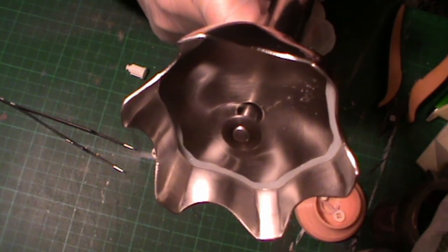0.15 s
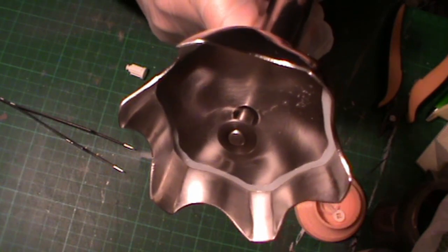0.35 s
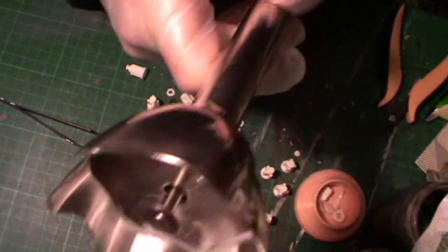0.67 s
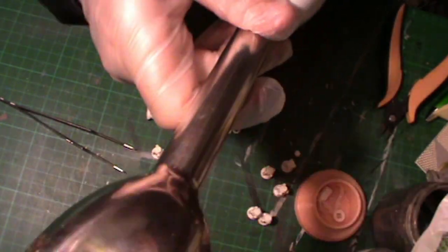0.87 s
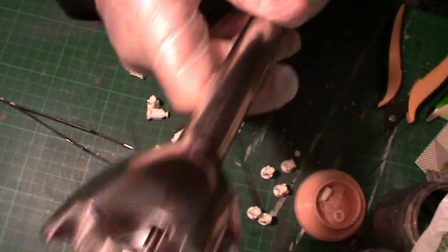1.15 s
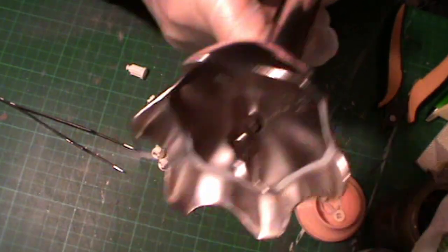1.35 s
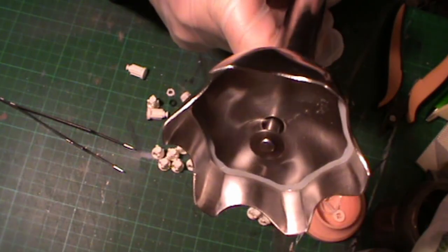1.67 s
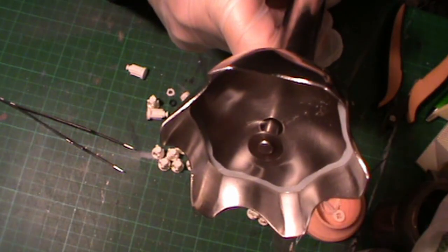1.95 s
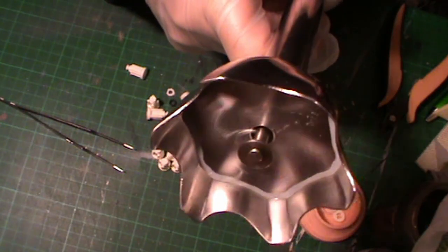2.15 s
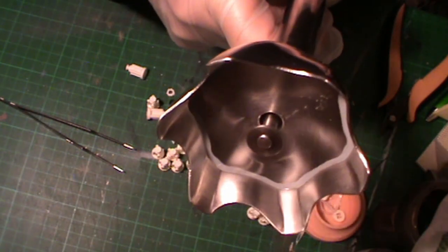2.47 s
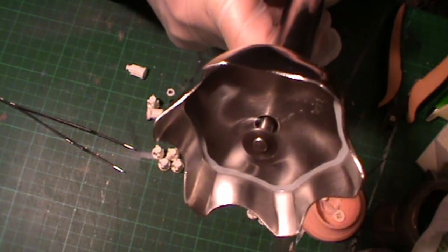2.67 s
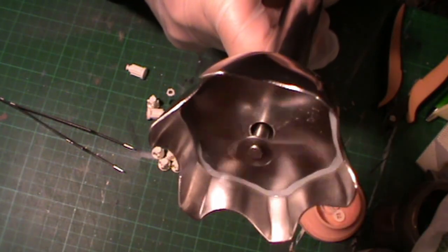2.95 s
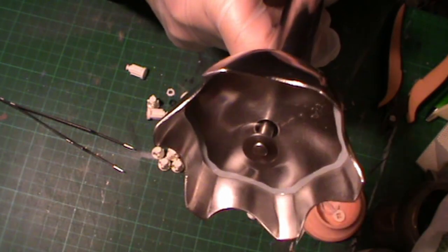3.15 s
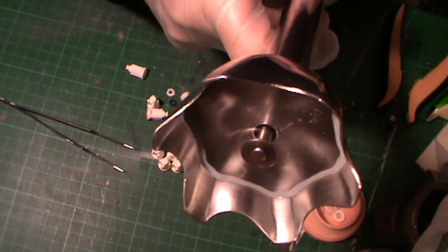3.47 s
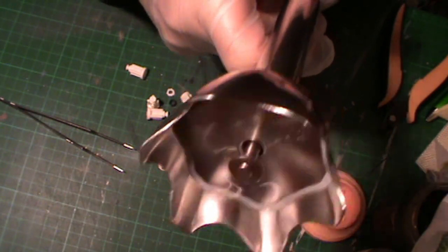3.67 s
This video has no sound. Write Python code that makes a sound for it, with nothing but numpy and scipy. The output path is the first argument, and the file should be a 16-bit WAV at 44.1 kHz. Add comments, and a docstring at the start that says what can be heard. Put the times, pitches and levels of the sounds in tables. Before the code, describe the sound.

A hand blender whirs fast and close in a small room, its draught briefly rumbling on the microphone around 0.3 seconds. It then winds down with a falling whine, stopping with a soft thud near 1.3 seconds. Three slower buzzing pulses follow at about 1.7, 2.4 and 3.2 seconds, each lasting up to half a second, starting with a clatter and coasting down with light metallic knocks.

```python
"""A hand blender runs dry above a workbench in a small room, close to one mono microphone. First a fast burst:
the unbalanced shaft hums, the fan rushes and the blade's draught hits the microphone. Brushes scrape the
commutator as it coasts to rest, and the trigger clacks once. Then three slow pulses buzz with the mains; the
loose coupling clatters at each start and knocks as it turns. Faint electronics chirp behind it all."""
import sys
import numpy as np
from scipy import signal
from scipy.fft import rfft, irfft
from scipy.io import wavfile
from scipy.ndimage import uniform_filter1d

SR = 44100
rng = np.random.default_rng(int(sys.argv[2]) if len(sys.argv) > 2 else 0)


def bounce(signal):
    """Save signal as a 16-bit WAV file at the path given by the first command-line argument."""
    frames = np.transpose(np.atleast_2d(signal))
    limited = np.clip(frames, -1, 1)
    pcm = np.round(limited * 32767).astype(np.int16)
    wavfile.write(sys.argv[1], SR, pcm)


N = 167580
T = np.arange(N) / SR
FULL_HZ, CRACK_S = 219.9, .0027  # full shaft speed; decay of a sharp contact
# slow pulses of the switch: on_s, off_s, shaft_hz, whine_db
PULSES = [(1.703, 2.095, 50.31, 2), (2.41, 2.754, 50.77, 1.5), (3.153, 3.665, 51.1, -5)]
# lift of brushes and whine as the hand tilts the motor towards the microphone: time_s, gain_db
NEARNESS = [(0, 0.5), (.6, -0.5), (.85, 3), (1.02, 3), (1.22, 6), (1.4, 0)]
# spectrum of a sharp contact in the coupling: frequency_hz, gain_db
CRACK = [(300, -8), (800, 7), (3000, -1.5), (4200, 0.5), (7500, -0.5), (10000, -9.5), (15000, -21)]


def shaft_speed(spin_up_s=.014, brake_hz_per_s=165):
    """Turns per second: after the burst, each pulse spins up, holds and is braked by friction."""
    # fast burst and its coast: time_s, shaft_hz
    burst = [(0, 185), (.054, 206), (.092, 214), (.16, 220), (.222, 221.5), (.268, 216), (.388, 178.5),
             (.526, 141), (.664, 109), (.782, 84), (.89, 64.5), (1.0, 46), (1.1, 30), (1.27, 0)]
    speed = curve(T, burst)
    for on, off, hz, _ in PULSES:
        rise = 1 - np.exp(-np.maximum(T - on, 0) / spin_up_s)
        speed += np.maximum(hz * rise - brake_hz_per_s * np.maximum(T - off, 0), 0)
    return speed * (1 + .001 * walk(8))


def brushes(speed, turns, count=144, roughness=.42, throb_hz=100):
    """The same commutator marks tick under the brushes on every turn; the current makes them throb."""
    # spectrum of the scrape: frequency_hz, gain_db
    scrape = [(100, -43.5), (280, -18.5), (420, -9.5), (620, -15.5), (870, -6.5), (1060, -14), (1380, -6),
              (1750, -10.5), (2100, -13), (2800, -3.5), (3300, -13), (3900, -18), (4900, -10.5),
              (5800, -17.5), (8200, -22), (9500, -17), (11000, -24), (13000, -27.5), (15700, -26)]
    marks = (np.arange(count) + rng.random(count)) / count
    lobes_db = 2.5 * np.cos(2 * np.pi * 3 * marks) + 2.5 * np.cos(2 * np.pi * 5 * marks)
    sizes = unit(rng.standard_normal(count) * undb(lobes_db))
    mark_turns = (np.arange(int(turns[-1]) + 1)[:, None] + marks).ravel()
    at = np.interp(mark_turns, turns, np.arange(N), right=N)
    hits = np.resize(sizes, len(at)) * (1 + roughness * noise()[:len(at)])
    i = at.astype(int)  # each tick is shared between two samples
    ticks = np.bincount(i, hits * (1 - at + i), N + 2) + np.bincount(i + 1, hits * (at - i), N + 2)
    throb = 1 + .1 * powered() * np.sin(2 * np.pi * throb_hz * T)
    slow_hz = PULSES[0][2]
    gain = (speed / slow_hz) ** .55 * undb(-42 + curve(T, NEARNESS))
    return colour(ticks[:N] * throb, scrape) * np.sqrt(SR / count / slow_hz) * gain


def motor_tones(speed, turns, whine_from_hz=54.2, whine_to_hz=143):
    """Unbalance hums; slots and bars whine at middling speeds. Both swell through body resonances."""
    # unbalance hum at full speed, before the body shapes it: shaft_multiple, level_db
    hum = [(1, -24), (2, -31), (3, -33.5), (4, -37), (5, -41), (6, -35), (7, -37), (8, -37), (9, -36.5),
           (10, -45), (14, -34.5)]
    # slot and commutator whine, before the body shapes it: shaft_multiple, level_db
    whine = [(8, -54.5), (12, -41.5), (24, -40), (48, -45.5), (72, -50)]
    # how well the body radiates: frequency_hz, gain_db
    radiation = [(60, -8), (110, -4.5), (220, -1.5), (300, -12), (420, -7), (600, -4.5), (700, -7),
                 (840, 2.5), (1000, -4.5), (1220, 0), (1350, 9), (1600, -6.5), (2250, 5.5), (2420, -11),
                 (2750, 4), (3300, -12), (4200, 8), (5300, 7.5), (6500, -17)]
    out, angle = 0, 2 * np.pi * turns
    for k, db in hum:
        gain = undb(db + walk(6.7) * min(k / 2, 2) + curve(k * speed, radiation))
        out += gain * (speed / FULL_HZ) ** 3.02 * np.sin(k * angle + 2 * np.pi * rng.random())
    unpulsed = 1 - uniform_filter1d(powered(), size=900)
    pulse_db = uniform_filter1d(sum((T > on) * (T < off) * db for on, off, _, db in PULSES), size=900)
    speed_band = speed ** 3 / (speed ** 3 + whine_from_hz ** 3) / (1 + (speed / whine_to_hz) ** 4)
    whine_gain = speed_band * undb(pulse_db - 1.13 * unpulsed + curve(T, NEARNESS))
    for k, db in whine:
        flutter_db = (.8 + 2.5 * unpulsed) * walk(45)
        gain = whine_gain * undb(db + flutter_db + curve(k * speed, radiation))
        out += gain * np.sin(k * angle + .44 * unpulsed * walk(60))
    return np.sqrt(2) * out


def fan_and_chatter(speed, turns, chatter_multiple=23.3, width_hz=560):
    """At speed the fan rushes and the brushes chatter near the bar rate, throbbing once a turn."""
    # spectrum of the fan's air: frequency_hz, gain_db
    fan = [(150, -40), (400, -10), (700, -27), (870, 0), (1080, -22), (1400, 0.5), (1800, -7.5), (2750, 5),
           (3600, 0.5), (5300, 0), (6700, -3.5), (8500, -1.5), (11500, -9.5), (12900, -11), (15700, -24)]
    fast = speed / FULL_HZ
    air = colour(noise(), fan) * undb(-18.5 + .49 * walk(32)) * fast ** 2.56
    angle = 2 * np.pi * chatter_multiple * turns
    # the band narrows as the shaft slows
    cosine, sine = (np.interp(turns / FULL_HZ, T, walk(width_hz)) for _ in range(2))
    chatter = (cosine * np.cos(angle) + sine * np.sin(angle)) * undb(-19.5) * fast ** 3.08
    throb = .9 * (1 + .33 * np.cos(2 * np.pi * turns))
    return throb * (air + chatter)


def coupling(first_knock_s=.0335, growth_db_per_s=11):
    """Play in the coupling: each pulse clatters, then knocks once a turn; coasting adds stray knocks."""
    # start clatter: start_s, level_db, crack_db
    jolts = [(1.7003, -23, -21.5), (1.7025, -19.5, -44), (1.7071, -16, -23.5), (1.712, -22.5, -33),
             (1.716, -25, -31), (2.4105, -19.5, -40), (2.4142, -29, -25.5), (2.4184, -20.5, -19.5),
             (2.4242, -21, -27), (2.4272, -31, -50), (2.433, -25.5, -48), (3.153, -24.5, -26.5),
             (3.1634, -24, -20.5), (3.168, -23.5, -25), (3.1741, -21, -29)]
    # loose knocks while coasting: start_s, level_db
    stray_knocks = [(1.161, -33.5), (1.23, -37), (1.236, -35), (2.113, -37), (2.136, -39), (2.161, -37.5),
                    (2.19, -36), (2.222, -39.5), (2.264, -39), (2.272, -42), (2.328, -42), (2.787, -32),
                    (2.817, -35), (2.873, -33.5), (2.88, -34), (2.9032, -38), (2.9128, -37), (2.923, -39),
                    (2.951, -39.5), (2.965, -40), (2.9805, -34), (3.679, -38), (3.701, -33.5), (3.721, -33),
                    (3.748, -36.5), (3.779, -35)]
    clatter = housing(contacts([(s, db) for s, db, _ in jolts], decay_s=.0036))
    cracks = colour(contacts([(s, db) for s, _, db in jolts], CRACK_S), CRACK)
    turn_knocks = [(s, -39 + growth_db_per_s * (s - on) + 1.5 * rng.standard_normal())
                   for on, off, hz, _ in PULSES for s in np.arange(on + first_knock_s, off, 1 / hz)]
    return clatter + cracks + knocks(turn_knocks + stray_knocks)


def knocks(rows, ring_s=.0016):
    """The coupling gives a short metallic ring and a dry tick for each row of start_s, level_db."""
    # ring of the coupling: pitch_hz, gain_db
    modes = [(1420, -8), (1700, -10), (2050, -10.5), (2380, -8.5), (2790, -3), (2950, -6)]
    age = T[:SR // 40]
    ring = sum(undb(db) * np.sin(2 * np.pi * hz * age) for hz, db in modes)
    ring *= age / ring_s * np.exp(1 - age / ring_s)
    times, levels = np.array(rows).T
    hits = np.bincount((times * SR).astype(int), undb(levels), N)[:N]
    ticks = undb(-12.5) * colour(contacts(rows, CRACK_S), CRACK)
    return np.sqrt(2) * signal.fftconvolve(hits, ring)[:N] + ticks


def housing(x, low_hz=392):
    """Light contacts ring the housing, with little bass."""
    # housing resonances: pitch_hz, width_hz, gain_db
    modes = [(630, 170, -5), (896, 79, -5.5), (1423, 165, -1.5), (1670, 460, -10), (2410, 200, -9),
             (2836, 88, 4.5), (2744, 120, 0.5), (2950, 93, -36)]
    click = signal.unit_impulse(2048)
    ring = sum(undb(db) * resonate(click, hz, width) for hz, width, db in modes)
    ring = signal.sosfilt(signal.butter(2, low_hz, "high", fs=SR, output="sos"), ring)
    return convolve(x, ring)


def bell(speed):
    """The shaft rubs in its bush and keeps the steel bell ringing."""
    # thin ring at full speed: pitch_hz, width_hz, level_db
    modes = [(9460, 400, -35.5), (12900, 530, -39)]
    ring = sum(undb(db) * unit(resonate(noise(), hz, width)) for hz, width, db in modes)
    return ring * (speed / FULL_HZ) ** 2.2


def mains(surge_db=6, surge_s=.038):
    """The windings buzz during each slow pulse, strongest with the inrush of current."""
    # steady mains harmonics: pitch_hz, level_db
    harmonics = [(100, -56.5), (300, -63.5), (400, -52.5), (600, -57), (700, -59.5), (900, -58),
                 (1000, -66), (1400, -68)]
    current = sum((T > on) * (T < off) * undb(surge_db * np.exp(-np.abs(T - on) / surge_s))
                  for on, off, *_ in PULSES)
    buzz = sum(undb(db) * np.sin(2 * np.pi * (hz * T + rng.random())) for hz, db in harmonics)
    return np.sqrt(2) * buzz * uniform_filter1d(current, size=300)


def draught():
    """Air from the blade rumbles on the microphone."""
    # gust at the microphone: time_s, level_db
    gust = [(0, -55), (.15, -45), (.27, -42), (.34, -30.5), (.42, -49), (.55, -66), (.9, -64)]
    # spectrum of the wind: frequency_hz, gain_db
    rumble = [(15, -16), (35, 5), (60, -6.5), (100, 5), (160, -20), (400, -37), (2000, -51)]
    return unit(colour(noise(), rumble)) * undb(curve(T, gust))


def trigger_clack(start_s=1.2635, level_db=-31):
    """The trigger clacks once."""
    # spectrum of the clack: frequency_hz, gain_db
    thud = [(60, -5), (230, 0), (700, -2), (1500, -2), (3500, -11), (8000, -24), (15000, -41)]
    return colour(contacts([(start_s, level_db)], decay_s=.005), thud)


def room(x, t60_s=.18, wet_db=-10):
    """Short reflections reach the microphone from the bench and near walls."""
    age = T[:SR // 2]
    tail = rng.standard_normal(len(age)) * undb(-60 * age / t60_s) * (age > .003)
    return x + undb(wet_db) * convolve(x, tail)


def electronics(rate_hz=23, pitch_hz=3604, sag=.14):
    """A faint electrical chirp and its octave repeat, falling in pitch each time."""
    cycle = np.cumsum(rate_hz * (1 + .028 * walk(14))) / SR % 1
    angle = 2 * np.pi * np.cumsum(pitch_hz * (1 - sag * cycle ** 2 + .0078 * walk(530))) / SR
    tone = undb(-63) * np.sin(angle) + undb(-61) * np.sin(2 * angle)
    return np.sqrt(2) * np.sin(np.pi * cycle ** .54) * tone


def room_tone(level_db=-54):
    """The room's own low noise, wavering slightly."""
    # spectrum of the quiet room: frequency_hz, gain_db
    floor = [(25, -7.5), (45, -15), (70, -14), (100, -2), (170, -18), (300, -13.5), (400, -5), (550, -10.5),
             (1300, -13), (2800, -12), (4400, -19.5), (7000, -21), (15700, -24)]
    return colour(noise(), floor) * undb(level_db + .4 * walk(7.1))


def powered():
    """1 while the switch is held for a slow pulse, else 0."""
    return sum(1. * (T > on) * (T < off) for on, off, *_ in PULSES)


def contacts(rows, decay_s, size=2048):
    """A short grinding burst for each row of start_s, level_db."""
    out, age = np.zeros(N + size), T[:size]
    envelope = 2 * age / decay_s * np.exp(1 - 2 * age / decay_s)
    for start_s, db in rows:
        i = int(start_s * SR)
        out[i:i + size] += undb(db) * envelope * rng.standard_normal(size)
    return out[:N]


def colour(x, points, size=2048):
    """Causal filter through points of frequency_hz, gain_db; keeps the power of white noise."""
    hz, db = np.array(points, float).T
    gain = undb(np.interp(np.log(np.fft.rfftfreq(size, 1 / SR) + 1), np.log(hz), db))
    cepstrum = irfft(np.log(gain))[:size // 2]
    cepstrum[1:] *= 2  # minimum phase
    return convolve(x, irfft(np.exp(rfft(cepstrum, size))))


def walk(rate_hz):
    """Smooth random wander with a spread of 1."""
    return unit(irfft(rfft(noise()) / (1 + (np.fft.rfftfreq(N, 1 / SR) / rate_hz) ** 4), N))


def convolve(x, response):
    return signal.fftconvolve(x, response / np.linalg.norm(response))[:N]


def resonate(x, hz, width_hz):
    return signal.lfilter(*signal.iirpeak(hz, hz / width_hz, fs=SR), x)


def curve(x, points):
    return np.interp(x, *np.array(points).T)


def undb(db):
    return 10 ** (np.asarray(db) / 20)


def unit(x):
    return x / np.sqrt(np.mean(x ** 2) + 1e-18)


def noise():
    return rng.standard_normal(N)


def scene():
    """The blender up front and the room behind, alike in both channels."""
    speed = shaft_speed()
    turns = np.cumsum(speed + 1e-6) / SR
    machine = brushes(speed, turns) + fan_and_chatter(speed, turns) + bell(speed)
    machine += draught() + trigger_clack() + coupling()
    mono = room(machine) + motor_tones(speed, turns) + mains() + electronics() + room_tone()
    return np.array([mono, mono])


def record(dry):
    """A mono microphone with a steep top cut at 15.9 kHz."""
    return signal.sosfilt(signal.ellip(10, .2, 80, 15900, fs=SR, output="sos"), dry)


dry = scene()
out = record(dry)
bounce(out)
```